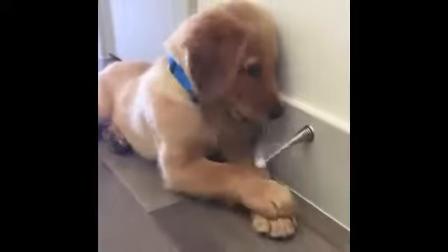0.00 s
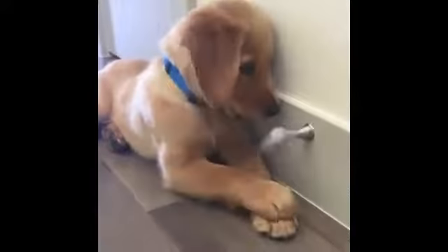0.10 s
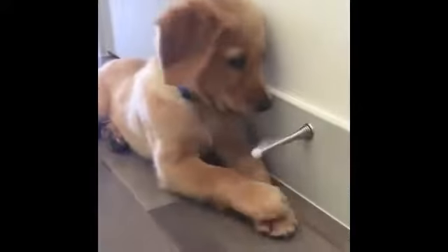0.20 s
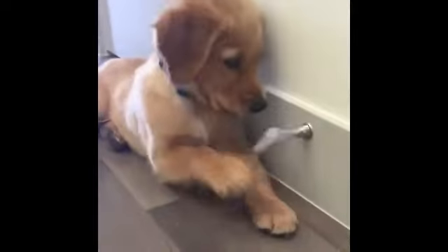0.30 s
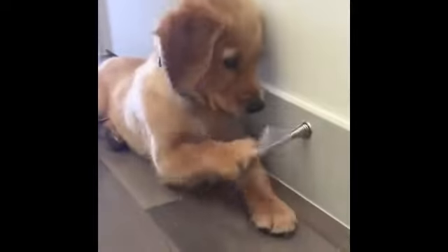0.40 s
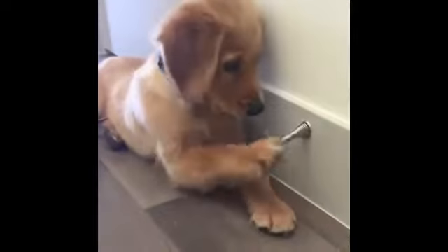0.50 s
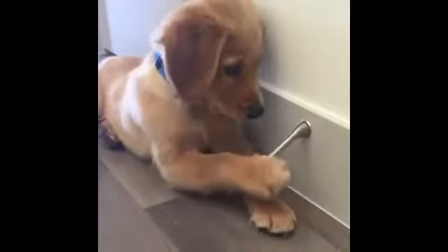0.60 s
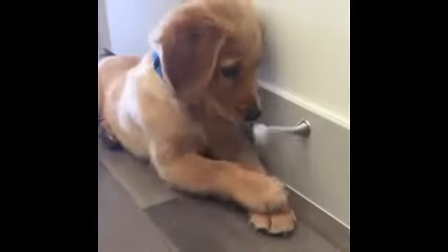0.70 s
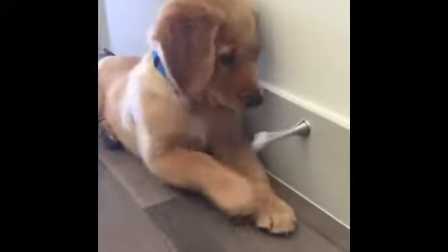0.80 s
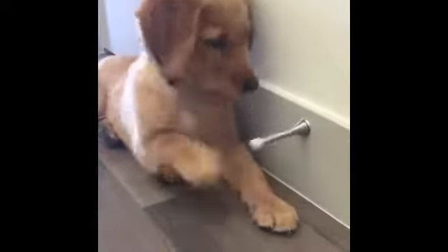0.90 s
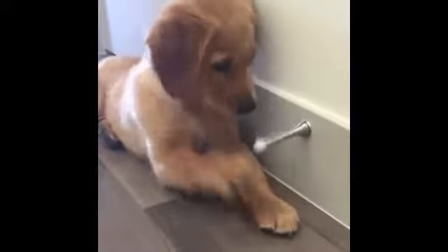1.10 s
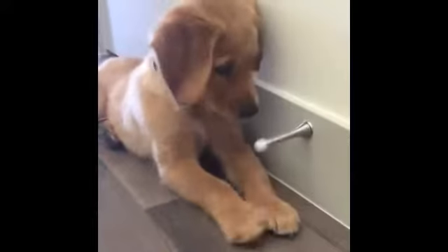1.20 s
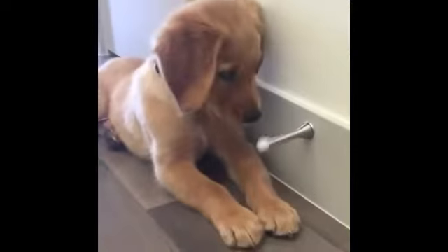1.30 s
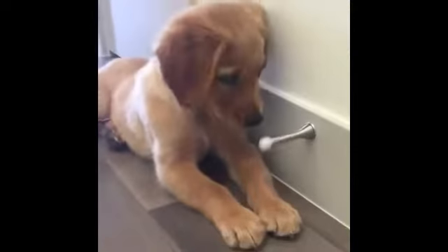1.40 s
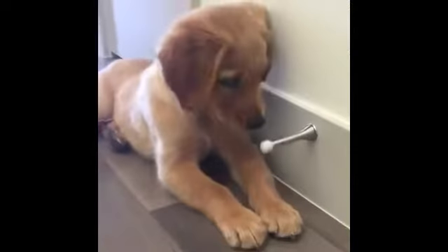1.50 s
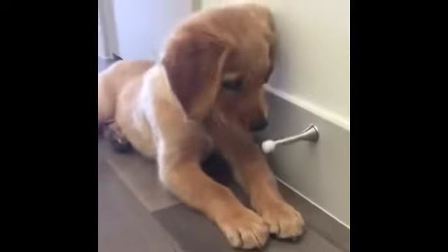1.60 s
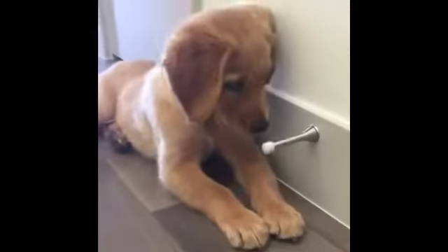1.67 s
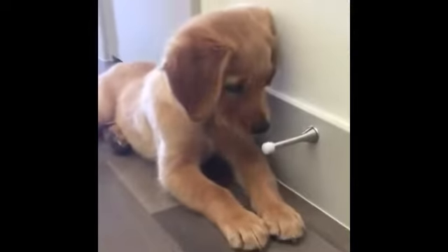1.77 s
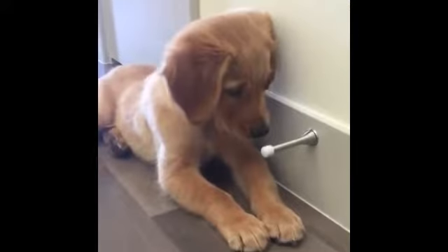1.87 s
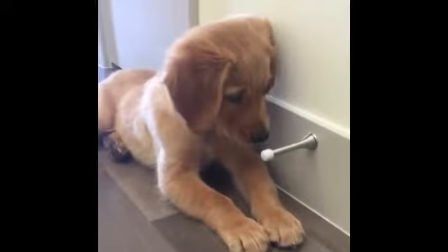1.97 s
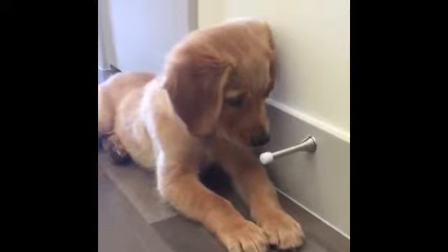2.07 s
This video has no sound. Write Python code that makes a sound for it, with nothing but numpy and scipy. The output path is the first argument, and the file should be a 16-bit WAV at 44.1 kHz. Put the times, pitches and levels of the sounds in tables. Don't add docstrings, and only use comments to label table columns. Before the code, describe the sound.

A spring doorstop is lightly touched, then flicked twice by a puppy's paw, buzzing in fast clacking pulses that quicken and die away; soft paw thumps on hard floor, close microphone, reverberant hallway, quiet room hum.

```python
import sys
import numpy as np
from scipy import signal
from scipy.io import wavfile

SR = 44100
rng = np.random.default_rng(int(sys.argv[2]) if len(sys.argv) > 2 else 0)


def wav_out(sig):
    wavfile.write(sys.argv[1], SR, np.round(np.clip(np.atleast_2d(sig).T, -1, 1) * 32767).astype(np.int16))


def undo_db(level):
    steps = np.asarray(level, float) / 20
    return 10 ** steps


N = 92610


def sieve(x, order, hz, kind):
    return signal.sosfilt(signal.butter(order, hz, kind, fs=SR, output="sos"), x)


def at_hz(points, hz, axis=1):
    p = np.array(points)
    return np.interp(np.log(hz), np.log(p[:, 0]), p[:, axis])


def train(s, gain):
    out = np.full(N, 1e-18)
    i = (np.asarray(s) * SR).astype(int)
    np.add.at(out, i[i < N], np.asarray(gain)[i < N])
    return out


def ring(clicks, hz, t60):
    r = undo_db(-60 / (t60 * SR))
    w = 2 * np.pi * hz / SR
    return signal.lfilter([0, np.sin(w)], [1, -2 * r * np.cos(w), r * r], clicks)


def lag(x, rise_s, fall_s):
    t = np.arange(6000) / SR
    hump = (1 - np.exp(-t / rise_s)) ** 2 * np.exp(-t / fall_s)
    return signal.fftconvolve(x, hump / hump.max())[:N]


def bands(size):
    edges = 25 * 2 ** np.arange(0, 9.4, .4)
    white = rng.standard_normal((2, size + 9000))
    for k, (low, high) in enumerate(zip(edges, edges[1:])):
        yield np.sqrt(low * high), sieve(white[k % 2], 2, [low, high], "band")[9000:]


# f/Hz, level/dB
ROOM_TONE = [(25, 0), (55, 18), (100, -5.5), (200, -19), (400, -19), (1000, -26), (3000, -32),
             (14000, -37.5)]
ROOM_TONE_DB = -46.5


def rumble():
    tone = sum(undo_db(at_hz(ROOM_TONE, hz)) * noise for hz, noise in bands(size=N))
    return undo_db(ROOM_TONE_DB) * tone / np.sqrt(np.mean(tone ** 2) + 1e-20)


# t/s, knock level/dB, tick level/dB
BLOWS = [(.0705, -21.5, -29.5), (0.2035, -46, -45), (0.279, -3, -12), (.3437, -38, -17.5),
         (1.0355, -12.5, -41), (1.638, -15, -52), (.6955, -5, -28.5), (0.891, -2.5, -18.5),
         (0.9801, -45, -17.5), (.9184, -10.5, -17), (1.0649, -19, -30.5), (1.358, -16, -41),
         (1.549, -15, -43), (1.722, -22, -53), (.5683, -12, -54), (1.2855, -8, -20), (1.3075, -9.5, -52),
         (1.5014, -12, -58), (1.660, -42, -53), (2.0035, -21, -58), (2.0455, -24.5, -58)]


def hard_contacts():
    return np.c_[BLOWS, np.zeros(len(BLOWS))]


def loose_coils():
    per_s = 1800
    struck = rng.random(N) < per_s / SR
    return struck * rng.standard_normal(N) * np.sqrt(SR / per_s)


# f/Hz, bandwidth/Hz, level/dB
COIL_BANDS = [(4320, 3300, -7), (5100, 3500, -1.5), (6200, 1900, -3), (8680, 830, -3), (11330, 7200, -13.5),
              (12540, 1540, -8)]


def coil_ticks(s, tick_db, smear):
    tick_gain_db, spread_db, slow_lead_s = 5.5, 3, .0035
    noise = rng.standard_normal((2, N))
    rattle = loose_coils() * lag(train(s, undo_db(tick_db - 26.5)), rise_s=0.0025, fall_s=0.04)
    tick = 0
    for k, (hz, width_hz, db) in enumerate(COIL_BANDS):
        gain = undo_db(tick_db + spread_db * rng.standard_normal(len(s)))
        crisp = lag(train(s, gain * (1 - smear)), rise_s=0.00037, fall_s=0.0015)
        slow = lag(train(s - slow_lead_s, gain * smear), rise_s=.0025, fall_s=.0018)
        burst = noise[k % 2] * (crisp + slow) + np.roll(rattle, 37 * k)
        edges_hz = [hz - width_hz / 2, hz + width_hz / 2]
        tick = tick + undo_db(db + tick_gain_db) * sieve(burst, 1, edges_hz, "band")
    return sieve(tick, 2, 3000, "high")


# f/Hz, level/dB, t60/s
BOARD = [(188, -9, 0.067), (289.5, -6, 0.019), (375, 2.5, 0.043), (628, -4.5, 0.031), (653, -11, 0.059),
         (931, -7.5, 0.027), (1109, -3.5, 0.014), (1454, -5, 0.014), (1780, -3, 0.0086), (2147, -3, 0.0067),
         (2650, -6.5, 0.0046), (3010, -11.5, 0.0064)]


def board_knock(s, knock_db):
    level_db, delay_s, spread_db = -5, 0.00101, 2
    low_late_s, scatter_s = .001, .0012
    dull_db_per_oct = 0.1554
    board = 0
    for hz, db, t60 in BOARD:
        softness = np.log2(hz / 130) * dull_db_per_oct * (knock_db + 14.5)
        colour = softness + spread_db * rng.standard_normal(len(s))
        late_s = scatter_s * (hz > 500) * rng.random(len(s)) + low_late_s * (hz < 500)
        hits = train(s + delay_s + late_s, undo_db(knock_db + db + level_db + colour))
        board = board + ring(hits, hz, t60)
    return sieve(board, 3, [181.5, 3700], "band")


def mount_buzz(s, knock_db):
    follows, level_db = 1.5, -14.5
    shape = lag(train(s, undo_db(follows * knock_db + level_db)), rise_s=0.002, fall_s=0.018)
    return sieve(loose_coils() * shape, 4, [1700, 3650], "band")


# f/Hz, level/dB, t60/s
WIRE = [(3580, -44, .1), (3690, -52, .25), (97.66, -37.5, 0.83), (202, -41.5, 0.94), (254, -35, 0.23),
        (290.6, -34.5, 0.22), (370.2, -34, 0.27), (612, -41.5, .25)]


def wire_ring(s, knock_db):
    follows, spread_db = 0.52, 2
    wire = 0
    for hz, db, t60 in WIRE:
        gain = undo_db(follows * knock_db + db + spread_db * rng.standard_normal(len(s)))
        wire = wire + ring(train(s, gain), hz, t60)
    return wire


# f/Hz, level/dB, t60/s
FREE_SPRING = [(349, -21.5, 0.086), (3950, -23, .012), (5200, -28, 0.015), (369.5, -37.5, 0.35),
               (626.5, -48.5, 1), (1217, -44.5, 0.37), (2520, -52, 0.29), (3620, -55, .8),
               (3950, -56, 0.86), (4200, -63, .8), (5260, -54, 0.92), (5400, -58, 1)]


def first_ring():
    touch = train([BLOWS[0][0]], [1])
    free = np.arange(N) / SR < BLOWS[1][0] + .01
    return free * sum(undo_db(db) * ring(touch, hz, t60) for hz, db, t60 in FREE_SPRING)


def floor_echo(clap):
    delay_s, level_db = .0036, -8
    n = np.arange(N)
    return undo_db(level_db) * np.interp(n - delay_s * SR, n, clap, left=0)


# f/Hz, level per Hz/dB, t60/s
HALL = [(90, -27, 0.74), (200, 5, 0.45), (370, 0, 0.6), (930, 3, 1), (2130, 6, 0.82), (3380, 2, 0.85),
        (6900, -14, 1.44), (13900, -10.5, 0.86)]


def hallway(x):
    level_db, onset_s = -6, 0.0075
    t = np.arange(SR) / SR
    tail = 0
    for hz, noise in bands(size=SR):
        decay_db = -60 * t / at_hz(HALL, hz, axis=2)
        tail = tail + undo_db(at_hz(HALL, hz) + decay_db) * noise
    onset = 1 - np.exp(-(t / onset_s) ** 2)
    tail = tail * onset * undo_db(level_db) / np.sqrt(.06 * SR)
    return signal.fftconvolve(x, tail)[:N]


# t/s, level/dB, f/Hz
PAW_FALLS = [
    (0.156, -10.5, 225),
    (0.347, -5, 166),
    (0.749, -18, 100),
    (1.426, -10.5, 159),
    (1.428, -17, 101.4),
    (1.262, -42, 102),
    (1.852, -33, 96),
]


def thumps():
    boom = 0
    for s, db, hz in PAW_FALLS:
        push = lag(train([s], [undo_db(db)]), rise_s=0.0048, fall_s=0.0025) / (0.0075 * SR)
        boom = boom + ring(push, hz, t60=0.3) + ring(push, hz * 1.09, t60=0.3)
    return sieve(boom, 4, 85, "high")


def claps(flick, back_tick_db, fade_db_per_s):
    swing = np.arange(2 * len(flick) - 1) / 2
    s, fore, back, place, tick = [np.interp(swing, np.arange(len(flick)), c) for c in np.transpose(flick)]
    back_s = s[:-1] + np.clip(place[:-1], .1, .9) * np.diff(s)
    back_tick = back[:-1] + back_tick_db - fade_db_per_s * (back_s - s[0])
    back_smear = np.clip(.5 + (tick[:-1] - back_tick) / 5, 0, 1)
    forward_rows = np.c_[s[:-1], fore[:-1], tick[:-1], 1 - back_smear]
    back_rows = np.c_[back_s, back[:-1], back_tick, back_smear]
    return np.vstack([forward_rows, back_rows])


# t/s, forward clap level/dB, back clap level/dB,
# back clap place in swing/0-1, forward tick level/dB
FLICK_A = [
    (.2107, -5, -7, .52, -12.5),
    (.3437, -8, -9, .51, -20),
    (.477, -12, -6.5, 0.47, -24),
    (.604, -13, -8.5, .465, -25),
    (.7315, -10.5, -17, .44, -23),
]


def first_flick():
    return claps(FLICK_A, back_tick_db=-13.5, fade_db_per_s=-8)


# t/s, forward clap level/dB, back clap level/dB,
# back clap place in swing/0-1, forward tick level/dB
FLICK_B = [(.892, -47, -5, .45, -25.5), (1.008, -17.5, -14.5, .5, -36), (1.119, -7.5, -11, .52, -22),
           (1.233, -23, -10, .37, -30.5), (1.335, -7.5, -12, .46, -20), (1.4346, -20, -14.5, .4, -25.5),
           (1.528, -10.5, -18.5, .46, -19.5), (1.6187, -15, -16, .47, -24.5),
           (1.703, -15.5, -35, .46, -30.5), (1.786, -18, -16.5, .48, -26.5),
           (1.870, -20.5, -22, .48, -36.5), (1.9524, -24, -24, .5, -49.5), (2.0345, -38, -49, .5, -56),
           (2.117, -46, -46, .5, -52)]


def second_flick():
    return claps(FLICK_B, back_tick_db=-12, fade_db_per_s=17.5)


def scene():
    rows = np.vstack([first_flick(), second_flick(), hard_contacts()])
    s, knock_db, tick_db, smear = rows.T
    clap = coil_ticks(s, tick_db, smear) + board_knock(s, knock_db) + mount_buzz(s, knock_db)
    wire = wire_ring(s, knock_db) + first_ring()
    spring = clap + floor_echo(clap) + wire
    return (spring + hallway(clap + wire) + thumps() + rumble())[None]


def low_pass(x):
    return signal.sosfilt(signal.butter(12, 15200, fs=SR, output="sos"), x)


def record(dry):
    bass_cut = sieve(dry, 2, 50, "high")
    rounded = 1.085 * np.tanh(bass_cut / 1.425)
    top_cut = signal.cheby2(8, 25, 14300, fs=SR, output="sos")
    mix = signal.sosfilt(top_cut, rounded)
    return low_pass(mix)


dry = scene()
out = record(dry)
wav_out(out)
```